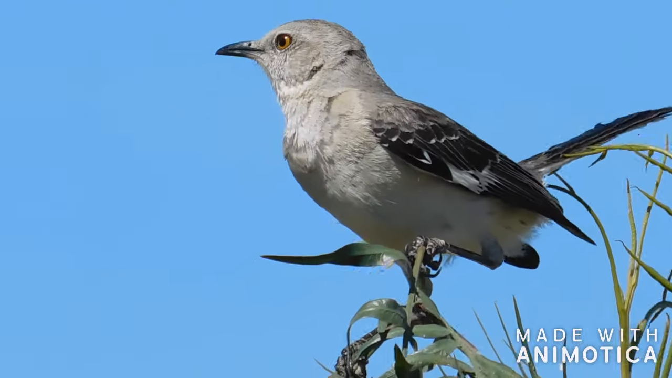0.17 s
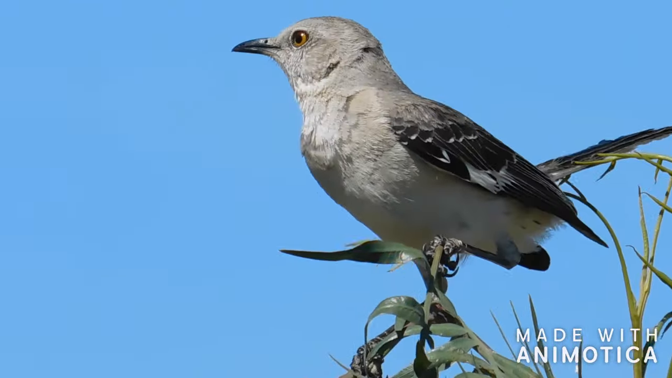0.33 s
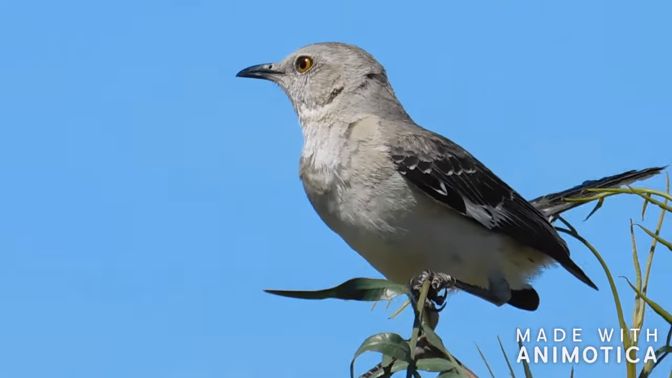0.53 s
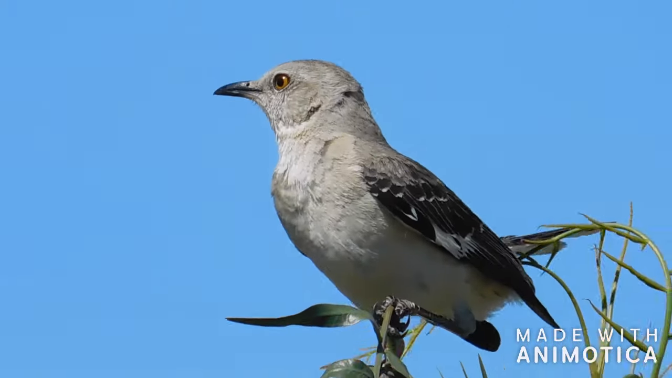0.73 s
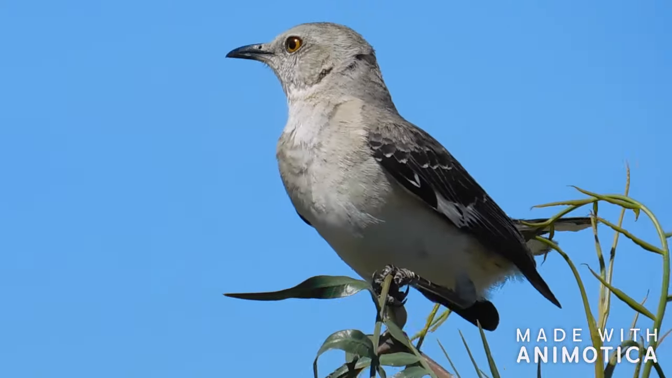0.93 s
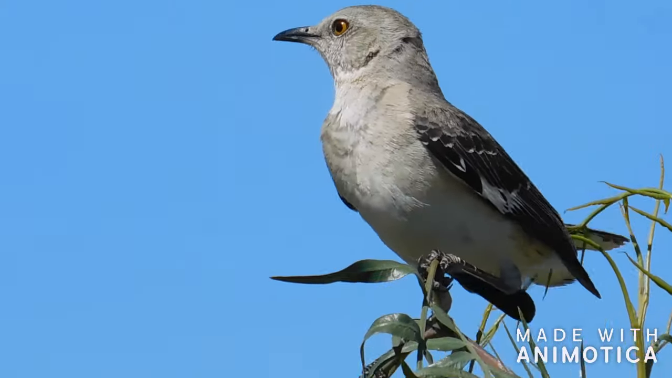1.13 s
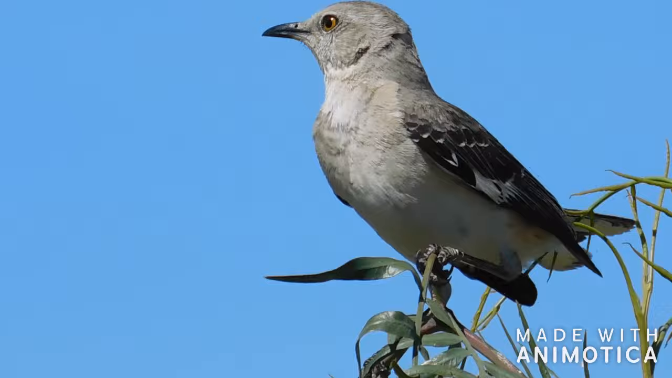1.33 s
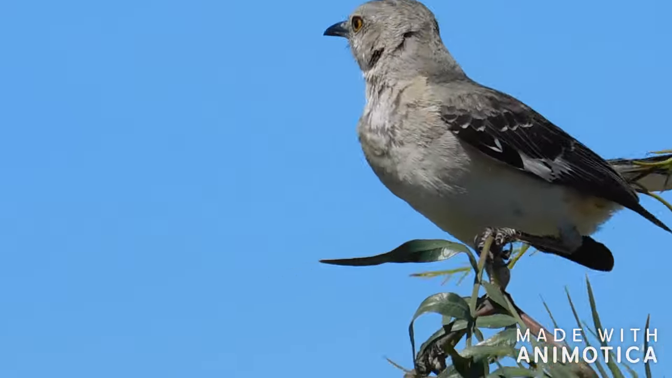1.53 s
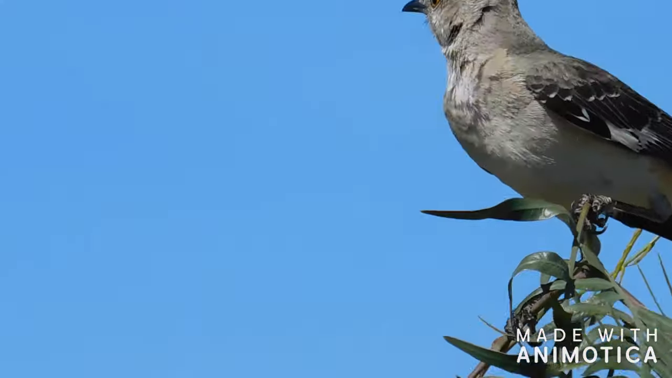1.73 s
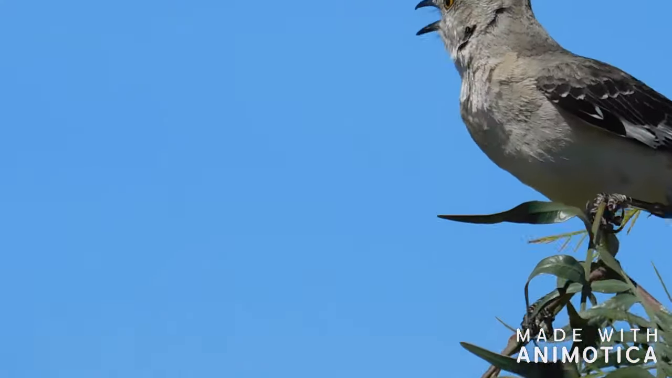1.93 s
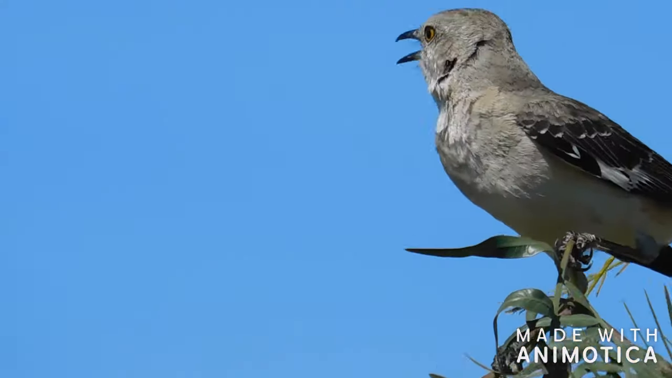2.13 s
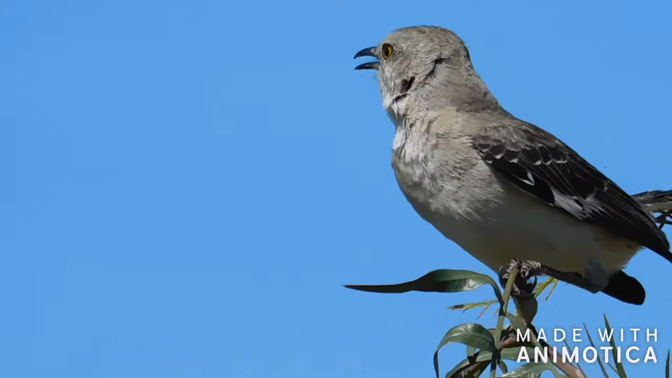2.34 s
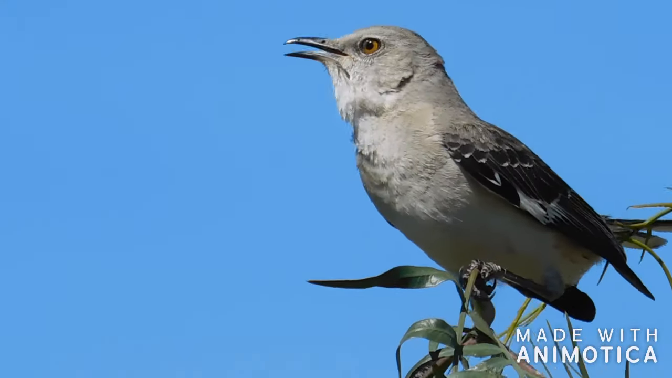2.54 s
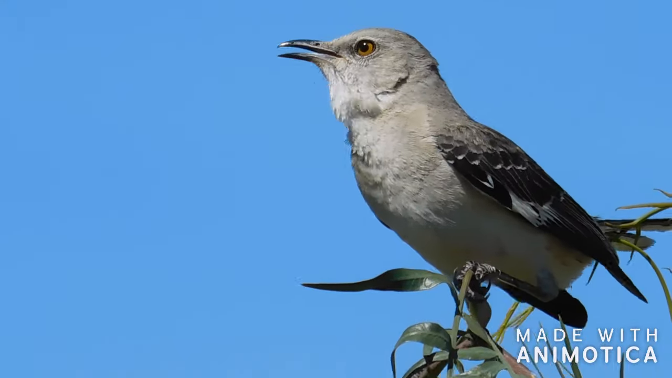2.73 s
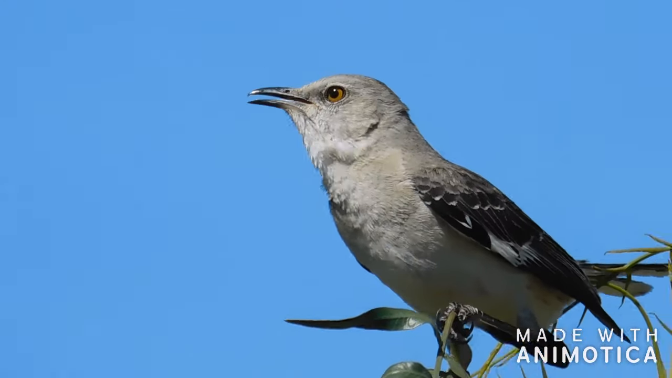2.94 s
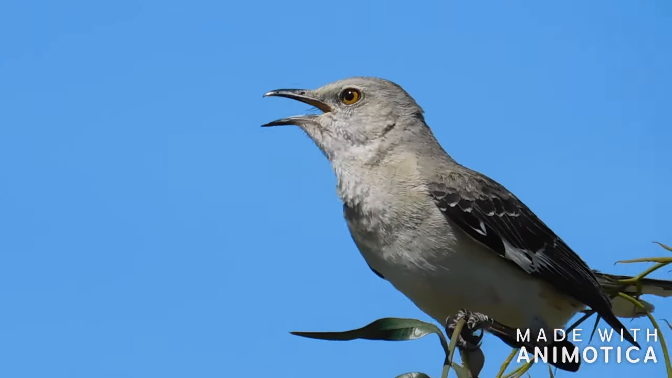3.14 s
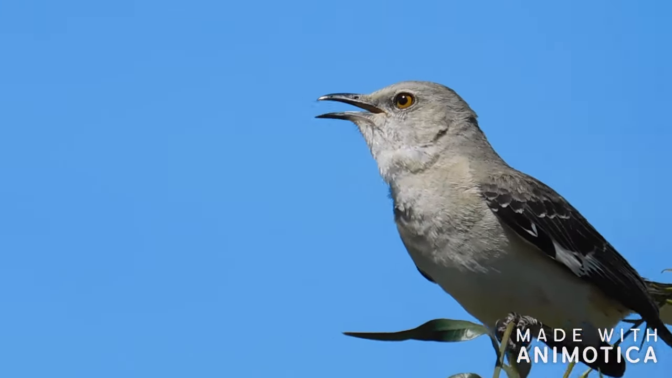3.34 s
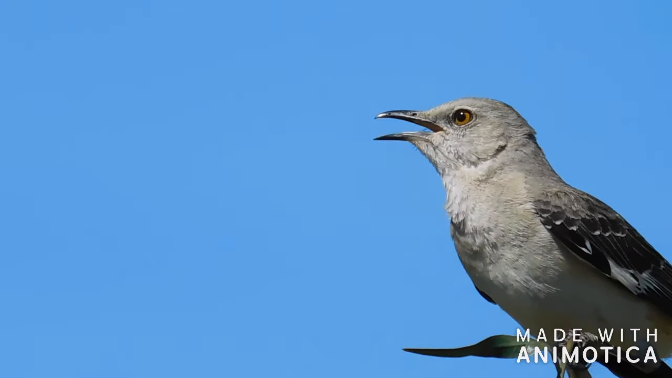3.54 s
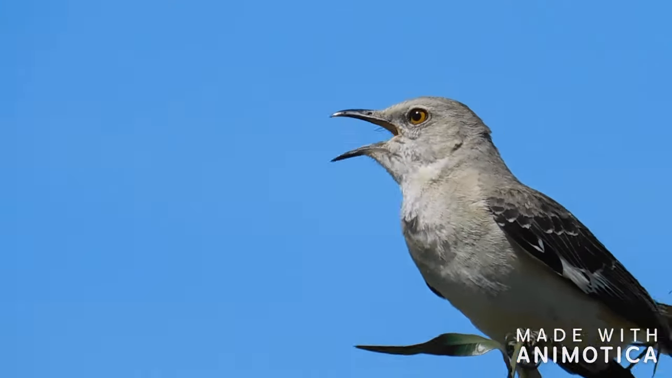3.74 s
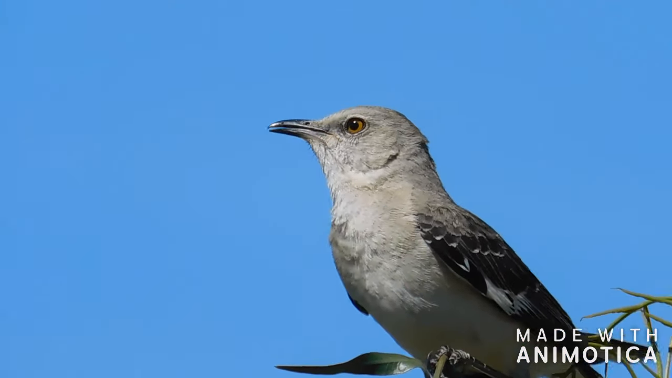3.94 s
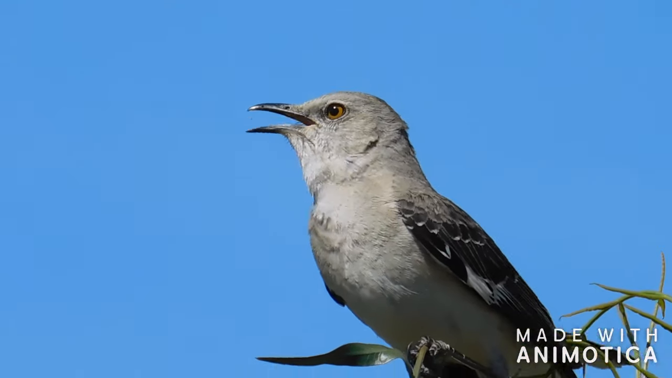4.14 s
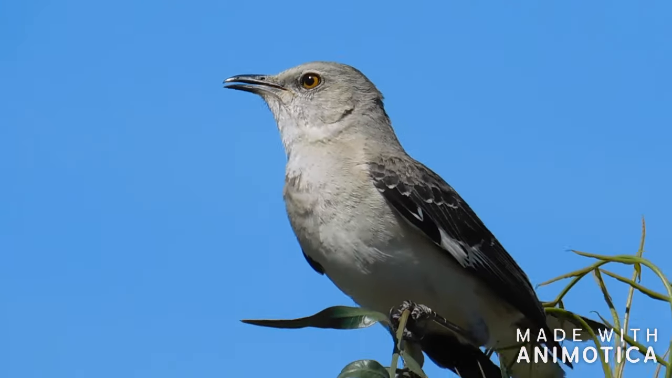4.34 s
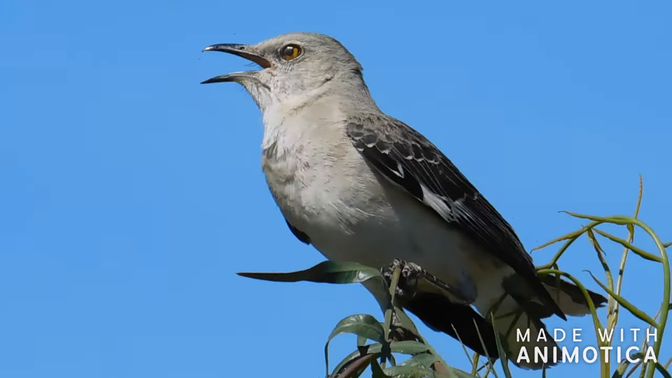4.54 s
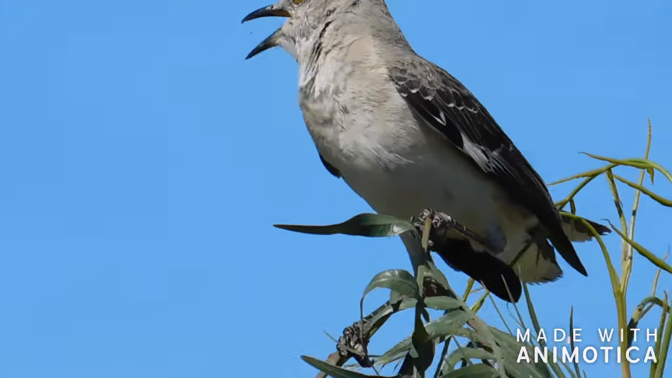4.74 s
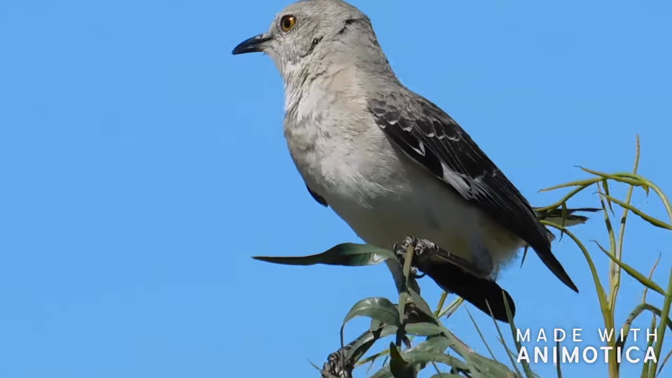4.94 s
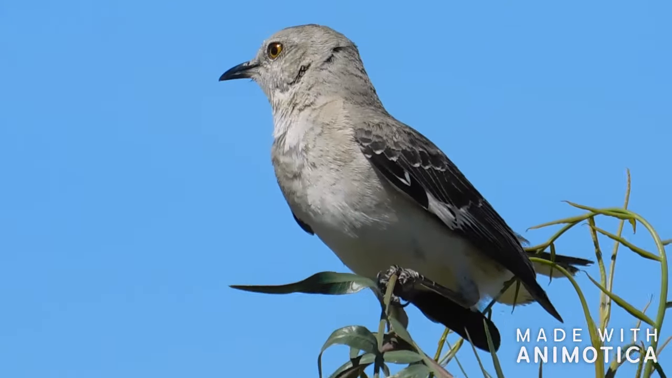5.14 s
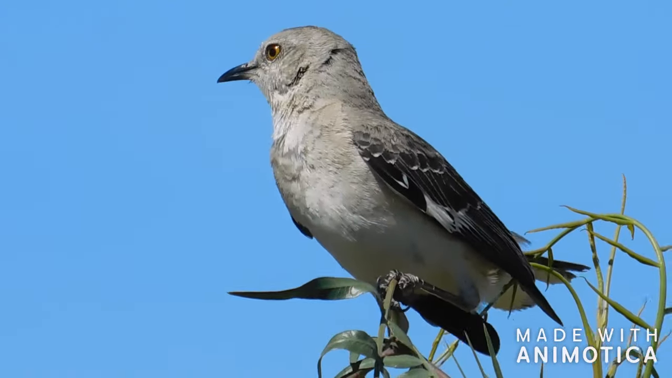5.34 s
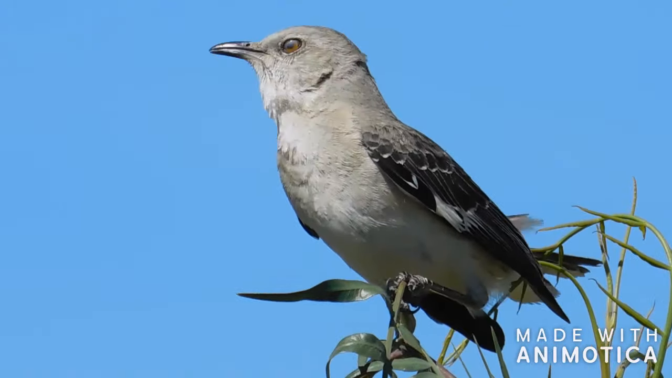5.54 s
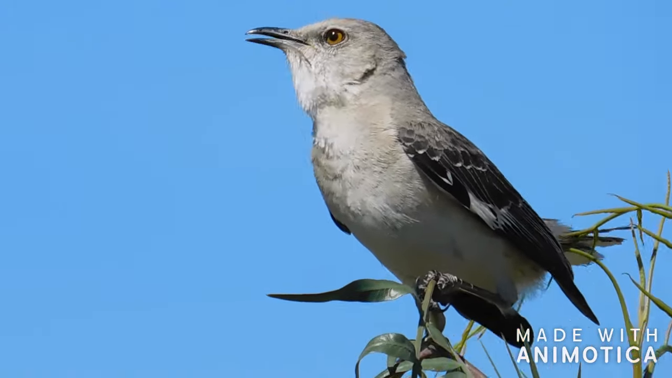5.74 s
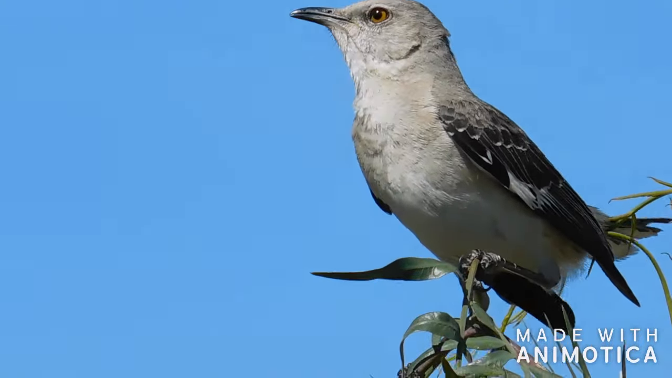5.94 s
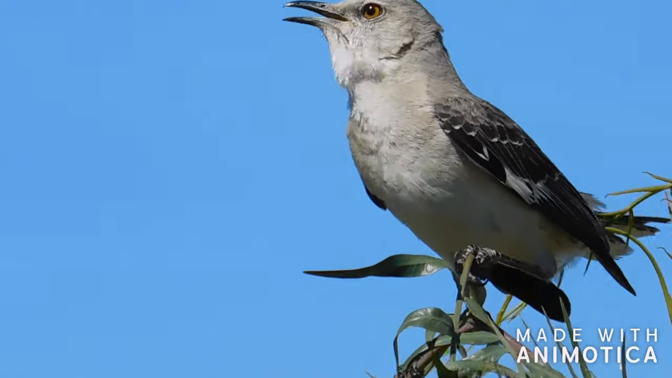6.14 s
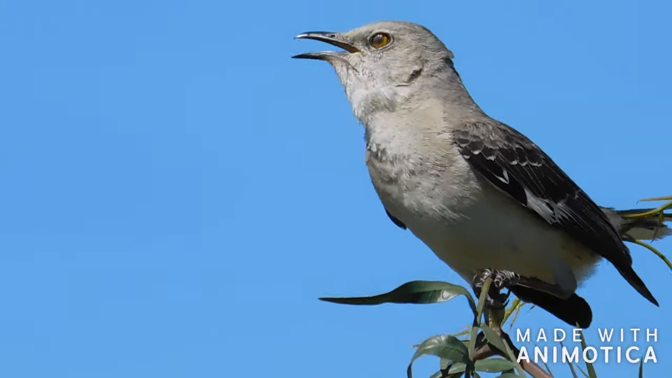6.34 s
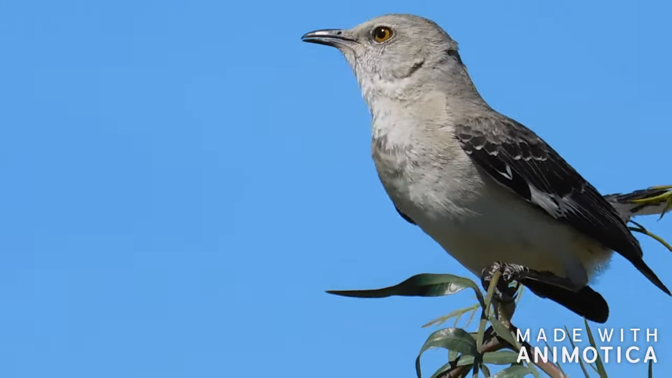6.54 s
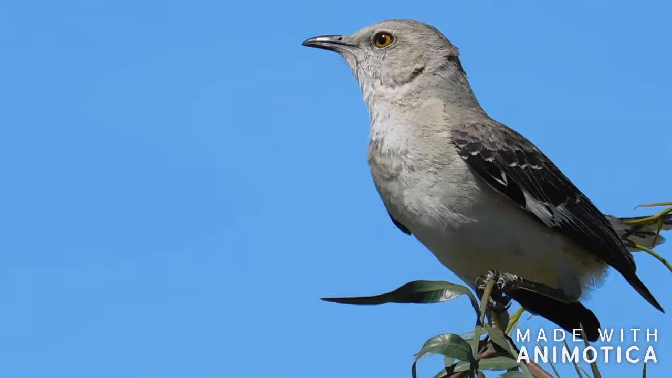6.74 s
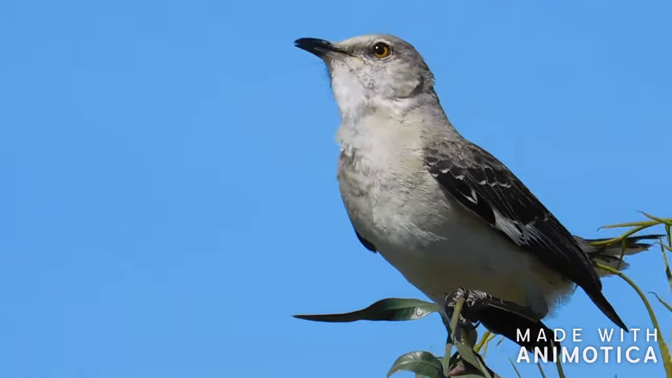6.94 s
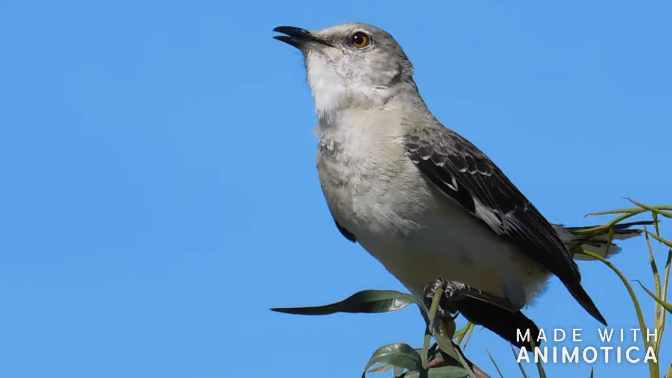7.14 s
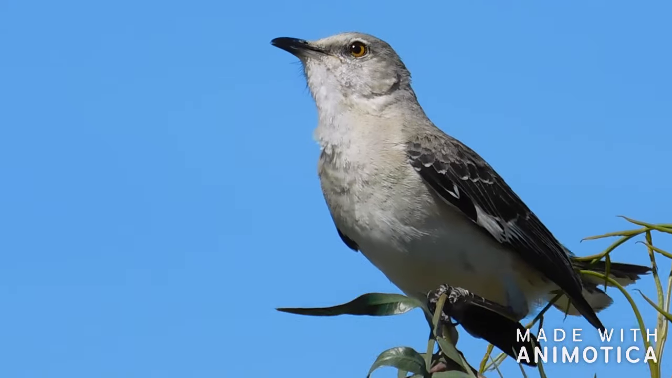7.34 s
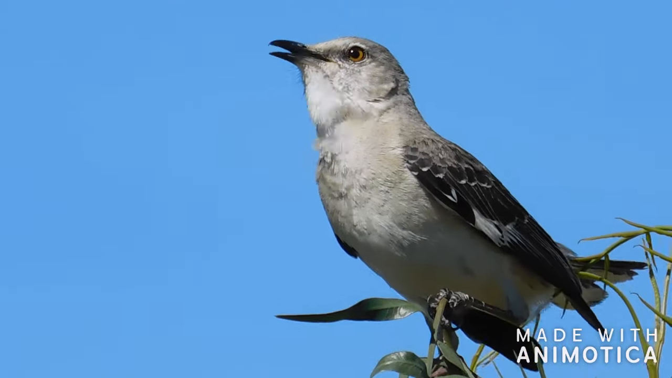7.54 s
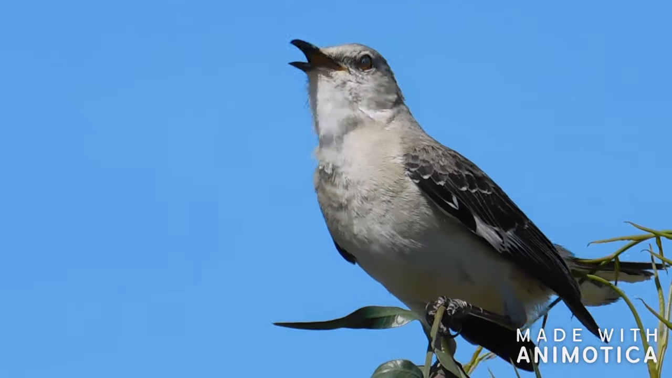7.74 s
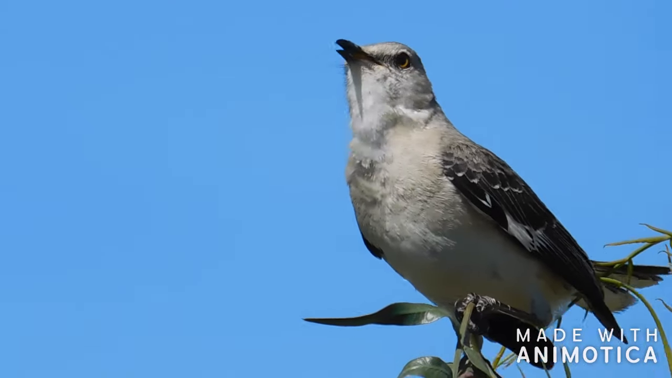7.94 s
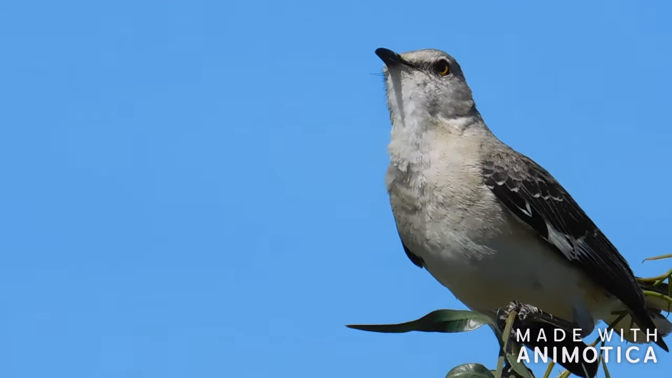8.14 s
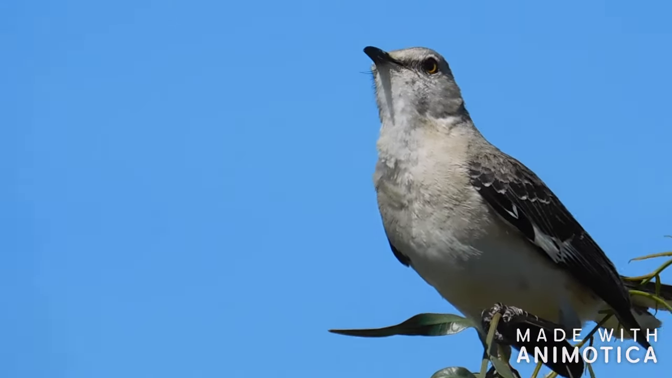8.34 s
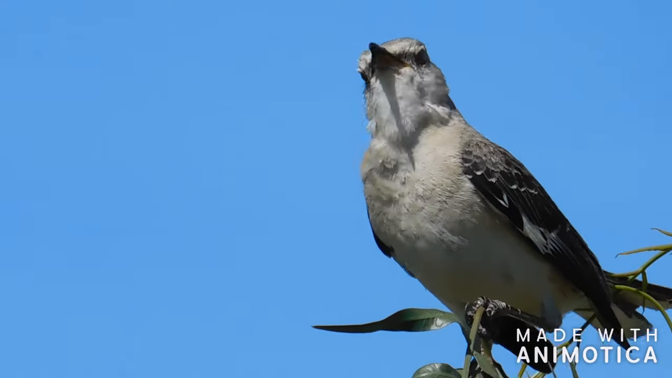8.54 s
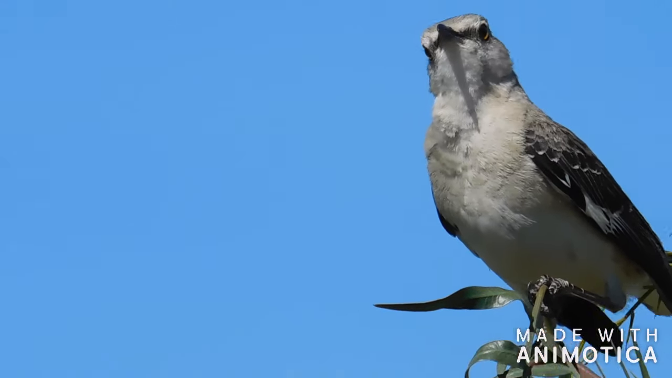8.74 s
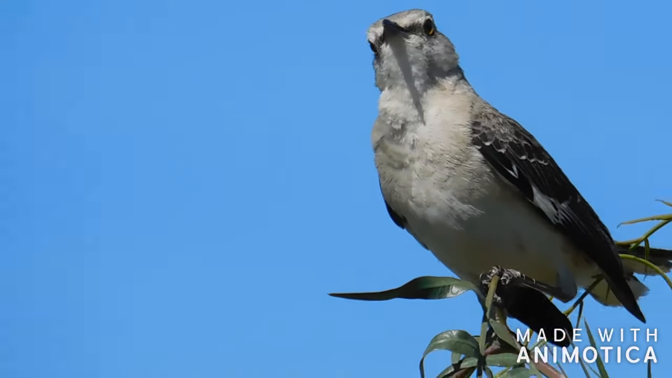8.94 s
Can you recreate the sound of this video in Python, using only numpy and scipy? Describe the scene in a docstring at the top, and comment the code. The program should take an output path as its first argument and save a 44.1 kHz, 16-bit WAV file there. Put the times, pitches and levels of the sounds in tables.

```python
"""Mockingbird in the open air

A mockingbird a few metres away repeats three phrases, then sings a few whistles once: gliding
near-sines with weak partials, and breath noise. Trees send back a thin echo of decaying noise. Around
it far traffic rumbles as shaped noise, an engine climbs through two gears as a rising tone, other birds
call faintly as curved sines, and low noise and soft knocks are wind on the two microphone ports."""
import sys
import numpy as np
from scipy import signal
from scipy.fft import rfft, irfft
from scipy.io import wavfile
from scipy.ndimage import uniform_filter1d

SR = 44100
rng = np.random.default_rng(int(sys.argv[2]) if len(sys.argv) > 2 else 0)


def linear_from_db(decibels):
    """Turn decibels (scalar or array-like) into linear amplitude factors; 0 gives 1."""
    return 10 ** (np.asarray(decibels, float) / 20)


def wav_out(sig):
    """Save sig, one row per channel (or a flat mono array), as 16-bit PCM at SR to the path in sys.argv[1]."""
    wavfile.write(sys.argv[1], SR, np.round(np.clip(np.atleast_2d(sig).T, -1, 1) * 32767).astype(np.int16))


N = 396018
T = np.arange(N) / SR

# wind and a slow engine over time: time_s, wind_rumble_db, firing_rate_hz, engine_partial_db
AIR_AND_ENGINE = [(0, -60, 22.5, -58.5), (1.2, -51, 15.1, -59.5), (1.903, -46, 16.9, -56),
                  (4.201, -55, 20.3, -62.5), (6.401, -69.5, 21.7, -57), (7.001, -73.5, 16, -75.5),
                  (7.6, -58.5, 32.6, -58), (8.98, -47, 22.8, -60.5)]
# beak opening, heard as a lift of the weak partials and the breath: time_s, lift_db
BEAK_OPENING = [(3.1, 1), (3.7, 6), (5.7, 3.5), (8.685, 4.5), (8.7, 10)]


def level(x, db):
    """Scale to an rms level."""
    return x * linear_from_db(db) / np.sqrt(np.mean(x ** 2))


def band(x, lo_hz, hi_hz):
    """Band-pass with gentle slopes."""
    return signal.sosfilt(signal.butter(2, [lo_hz, hi_hz], "band", fs=SR, output="sos"), x)


def walk(rate_hz):
    """Random wander: levels held for one period of the rate and slewed twice; spread somewhat under 1."""
    hold = int(SR / rate_hz)
    steps = np.repeat(rng.standard_normal(N // hold + 1), hold)
    return uniform_filter1d(uniform_filter1d(steps, hold), hold)[:N]


def town():
    """Far traffic and hiss in broad bands that drift a little; alike at both ports only in the bass."""
    # relative noise spectrum: frequency_hz, density_db (per Hz)
    town_spectrum = [(30, -10.5), (110, -10.5), (190, -22.5), (480, -21.5), (965, -18.5), (1700, -23),
                     (3290, -34), (5460, -45.5), (15700, -50.5)]
    hz, db = np.transpose(town_spectrum)
    bins_hz = np.fft.rfftfreq(N, 1 / SR)
    shape = linear_from_db(np.interp(np.log(bins_hz + 1), np.log(hz), db))
    alike = 0.93 / (1 + (bins_hz / 980.0) ** 2)
    mid, side = rfft(rng.standard_normal((2, N))) * shape * np.sqrt([1 + alike, 1 - alike])
    pair = np.array([mid + side, mid - side])
    octave = np.log2(bins_hz / 150 + 1).astype(int)
    out = 0
    for k in range(octave.max() + 1):
        out = out + irfft(pair * (octave == k), N) * linear_from_db(0.69 * walk(5.6))
    # a narrow wavering band of noise sits in the low treble
    whirr = band(rng.standard_normal((2, N)), 1754, 1804) * linear_from_db(2.4 * walk(11))
    return level(out, -53.5) + level(whirr, -65.0)


def engine():
    """A low tone that rises in each gear and fades at the change, over the low partials of a slow engine."""
    # an engine pulling in one gear: start_s, end_s, start_hz, end_hz, level_db
    gears = [(2.702, 4.253, 128, 150.3, -61.5), (4.788, 8.192, 121.6, 161.2, -60.5)]
    s, _, firing_hz, firing_db = np.transpose(AIR_AND_ENGINE)
    wavering_hz = np.interp(T, s, firing_hz) * (1 + 0.0075 * walk(4.5))
    turn = 2 * np.pi * np.cumsum(wavering_hz) / SR
    partials = sum(linear_from_db(2 * walk(1.7)) * np.sin(k * turn) for k in range(2, 6))
    out = linear_from_db(np.interp(T, s, firing_db)) * partials
    for start_s, end_s, start_hz, end_hz, db in gears:
        fade = np.clip(np.minimum((T - start_s) * 2, (end_s - T) * 10), 0, 1)
        hz = np.interp(T, [start_s, end_s], [start_hz, end_hz]) * (1 + 0.0042 * walk(6.5))
        out += fade * linear_from_db(db + walk(3.2)) * np.sin(2 * np.pi * np.cumsum(hz) / SR)
    return out


def wind():
    """A fluttering rumble, partly shared by the ports, and buffets: a burst of rumble with a soft knock."""
    # wind buffets, levels before the split between ports:
    # time_s, knock_db, right_share (0-1), burst_db
    buffets = [(1.448, -33.5, 0.25, -41), (1.493, -36, 0, -37.5), (1.851, -28.5, 0.04, -46),
               (2.115, -35, 0.07, -41), (2.181, -30, 0.1, -35), (2.373, -33.5, 0, -43),
               (2.55, -36.5, 0.02, -42.5), (4.935, -32.5, 0.76, -33.5), (8.632, -37.5, 1, -43.5)]
    s, db = np.transpose(AIR_AND_ENGINE)[:2]
    noise = rng.standard_normal((4, N))
    flutter = linear_from_db(1.8 * np.array([walk(24), walk(23.0)]))
    rumble = level(band(noise[:2] * flutter + noise[2], 21, 72.0), 0)
    eddies = level(band(noise[3] * linear_from_db(4.74 * walk(40)), 27, 86), 0)
    # the left port takes 3 dB more wind than the right
    out = rumble * linear_from_db(np.interp(T, s, db) + np.array([[1.5], [-1.5]]))
    for at, knock_db, right, burst_db in buffets:
        t = T - at
        knock = 1.85 * np.cos(2 * np.pi * 90 * t) / (1 + (t / 0.0017) ** 2)
        burst = eddies * np.exp(-(t / 0.046) ** 2)
        ports = 1.3 * np.array([1 - right, right])
        out += np.outer(ports, linear_from_db(knock_db) * knock + linear_from_db(burst_db) * burst)
    return out


def add(out, rows, partials_db, flutter_db=0., throb_hz=0.):
    """One note: a gliding near-sine with weak partials, which grow with pitch and drift, each by itself."""
    s, hz, db, *depth = np.transpose(rows)
    at = slice(int((s[0] - .002) * SR), int((s[-1] + .002) * SR))
    t = T[at]
    soft = lambda y: uniform_filter1d(y, size=50, mode="nearest")
    pitch = soft(np.interp(t, s, hz))
    # breath pressure swells in arcs rather than in straight dB lines
    pressure = soft(np.interp(t, s, linear_from_db(db) ** .6, left=0, right=0))
    gain = pressure.clip(0) ** (1 / .6)
    if depth:  # each throb is a short, uneven downward slur
        throb = 2 * np.pi * throb_hz * (t - s[0]) + 1.1 * walk(throb_hz / 2)[at]
        d = np.clip(np.interp(t, s, depth[0]), 0, 1)
        gain = gain * (1 - d * np.cos(throb))
        pitch = pitch * (1 + 0.07 * d * np.sin(throb))
    phase = 2 * np.pi * np.cumsum(pitch) / SR
    beak_db = np.interp(t, *np.transpose(BEAK_OPENING))
    for k, partial_db in enumerate(partials_db, 1):
        knots = np.linspace(t[0], t[-1], num=8)
        drift = np.interp(t, knots, rng.standard_normal(size=8)).clip(max=.5)
        audible = k * pitch < SR / 2
        if k == 2:  # from here up the partials swell less than the fundamental
            gain = gain ** .6 * linear_from_db(-12)
        lift_db = flutter_db * drift + 6.8 * np.log2(pitch / 2200) + beak_db
        weak = partial_db < -20  # strong partials hold steady
        out[at] += np.sqrt(2) * audible * gain * linear_from_db(partial_db + weak * lift_db) * np.sin(k * phase)


def far_birds():
    """Faint curved whistles, loudest in the middle, peeps and scattered chatter; they shimmer on their long way."""
    # far calls: start_s, length_s, start_hz, middle_hz, end_hz, level_db (mid-note, before shimmer)
    calls = [(0.222, .06, 2650, 2550, 2300, -63), (0.495, .1, 2600, 2350, 2080, -64),
             (0.702, .135, 4600, 4380, 4330, -81), (0.752, .12, 900, 980, 1060, -59),
             (0.768, .05, 2700, 2540, 2300, -62), (0.92, .045, 2150, 2200, 2050, -63),
             (0.99, .03, 2000, 2100, 2250, -64), (1.096, .035, 2850, 3080, 3150, -65),
             (4.58, .035, 2450, 2450, 2200, -64), (5.125, .055, 3620, 2950, 2620, -64),
             (5.28, .03, 2150, 2420, 2200, -60), (6.125, .06, 2500, 2850, 1900, -62),
             (6.196, .022, 2020, 2060, 2150, -61), (8.49, .055, 4200, 4600, 3900, -76),
             (8.91, .055, 2550, 2750, 2850, -64)]
    # a far run of arched peeps: start_s
    peep_starts = [5.408, 5.453, 5.486, 5.515]
    # pitch range of the chatter: low_hz, high_hz
    chatter_range = (2000, 3200)
    peep_s = .024
    out, place = np.zeros(N), np.linspace(-1, 1, num=9)
    peeps = [(s, peep_s, 2950, 3400, 2950, -63) for s in peep_starts]
    chatter = []
    for when, a, b in rng.random(size=(70, 3)):
        glide_hz = np.interp([a, a, (a + b) / 2], [0, 1], chatter_range)
        chatter.append((.1 + 8.7 * when, peep_s, *glide_hz, -72))
    for s, length_s, start_hz, mid_hz, end_hz, db in calls + peeps + chatter:
        slope, bow = (end_hz - start_hz) / 2, (start_hz + end_hz) / 2 - mid_hz
        hz = mid_hz + slope * place + bow * place ** 2
        rows = np.transpose([s + (place + 1) / 2 * length_s, hz, db - 6 * place ** 2])
        add(out, rows, [0])
    return out * linear_from_db(4 * walk(150))


def trees(x, db, t60_s):
    """A thin wash off foliage and ground with a few distinct echoes, different at each port, without the top."""
    # single trees and walls that stand out of the echo: delay_s, lift_db
    reflectors = [(0.044, 8), (0.092, 6), (0.275, 24)]
    t = T[:SR]
    lift_db = sum(up_db * np.exp(-((t - s) / 0.0057) ** 2) for s, up_db in reflectors)
    decay = linear_from_db(lift_db - 60 * t / t60_s)
    echo = rng.standard_normal((2, SR)) * decay * np.clip(t / 0.007, 0, 1)
    echo = band(echo / np.sqrt(np.sum(echo ** 2) / 2), 500, 3700)
    return linear_from_db(db) * signal.fftconvolve(x[None], echo, axes=1)[:, :N]


def sung(gesture, s, lead_s, tail_s, low_hz, high_hz, db, swell_db=0., whip_hz=0.):
    """A gesture stretched to one syllable's time, range and level; a whip bends its end upward."""
    place, share, below_db = np.transpose(gesture)
    at = s + place * np.where(place < 0, lead_s, tail_s)
    hz = low_hz + share * (high_hz - low_hz) + whip_hz * np.abs(place) ** 4.5
    return np.transpose([at, hz, db + below_db + swell_db * (place - .5)])


def fall(s, length_s, top_hz, rest_hz, last_hz, db, fade_db):
    """Pitch relaxes from the top to rest and drifts on; quick attack, accent, even fade, quick release."""
    place = np.linspace(0, 1, num=80)
    t = place * length_s
    settle = np.exp(-(t / 0.0093) ** 1.275)
    hz = rest_hz + (top_hz - rest_hz) * settle + (last_hz - rest_hz) * place ** 2
    edges = np.exp(-(t / 0.0044) ** 2) + np.exp((t - length_s) / 0.0037)
    accent = np.exp(-((t - 0.023) / 0.019) ** 2)  # swells just as the pitch lands
    return np.transpose([s + t, hz, db + fade_db * place - 26 * edges + 2.5 * accent])


def song():
    """The plain whistled notes as rows of time, pitch and level."""
    # Gestures: place, pitch_share (of the way from low to high), level_db (relative to the syllable).
    # Place -1..0 spans the lead and 0..1 the tail.
    chip, chuck = [(-1, 0.91, -18.5), (-0.44, 0.32, -1.5), (-.25, .02, -7.5), (0.095, 1, -8),
                   (.15, 0.66, -1), (0.41, 0.29, -0.5), (0.98, -0.058, -19.5)], [(-0.95, 1.39, -26.5), (-.62, 0.51, -6.5), (-.33, .2, -0.3),
                                 (-0.088, 1, -3), (0.049, .75, -3.5), (0.28, .45, -1), (.75, 0.009, -11.5),
                                 (0.92, 0.071, -19.5)]
    rise, climb = [(0, 0.27, -34.5), (.2, 0.031, -15), (.6, .25, -2), (.85, 0.52, 0), (.93, .85, -17.5),
                   (1, 0.39, -27)], [(0, 0.035, -28.5), (.14, 0.28, -10.5), (.27, .6, -5.5), (.42, 0.75, 1),
                                 (.6, .87, -3.5), (.75, .94, 1.5), (.94, 0.94, -12), (1, 0.98, -17)]
    # two-part syllables: turn_s, lead_s, tail_s, low_hz, high_hz, level_db
    chips, chucks = [(2.04, 0.012, 0.034, 2004, 2704, -36.5), (2.26, 0.018, 0.025, 2023, 2800, -30),
                     (2.485, 0.017, 0.031, 2010, 2735, -31.5), (2.71, 0.016, .032, 2020, 2780, -29),
                     (2.945, 0.019, 0.022, 2003, 2720, -27)], [(5.683, 0.025, .029, 2150, 2930, -29),
                                    (6.339, 0.024, .034, 2050, 2830, -25.5),
                                    (7.033, 0.026, .03, 2010, 2842, -26)]
    # one-part syllables: start_s, length_s, low_hz, high_hz, level_db, swell_db (start to end);
    # climbs add whip_hz, an upward bend at the end
    rises, climbs = [(2.094, 0.041, 2690, 3555, -29, 2), (2.305, 0.055, 2756, 3560, -25, -4),
                     (2.533, 0.052, 2697, 3474, -24.5, -0.5), (2.758, 0.057, 2653, 3616, -23.5, -2.5),
                     (3.01, 0.043, 2564, 3780, -24.5, 2.5)], [(3.407, 0.062, 1943, 3536, -30, -4.5, 992),
                                    (3.857, 0.072, 2015, 3694, -31, 8.5, 772),
                                    (4.317, 0.066, 1784, 3790, -26.5, -3, 908),
                                    (4.851, 0.068, 2063, 3450, -33.5, -5.5, 2040)]
    # after a break the voice drops from the top and settles:
    # start_s, length_s, top_hz, resting_hz, last_hz, level_db, fade_db
    falls = [(2.141, 0.04, 3920, 2873, 2745, -27.5, -7), (2.359, 0.042, 3970, 2836, 2704, -26, -8.5),
             (2.583, 0.053, 3834, 2775, 2514, -22.5, -16.5), (2.815, 0.064, 3996, 2750, 2870, -23.5, -15),
             (3.054, 0.054, 4030, 2874, 2555, -23.5, -10.5), (3.469, 0.065, 4490, 2846, 2765, -24, -7.5),
             (3.925, 0.068, 4490, 3010, 2983, -25, -5), (4.382, 0.073, 4710, 2760, 2990, -21.5, -17),
             (4.921, 0.078, 4750, 2847, 2754, -28, -5)]
    # notes sung only once: time_s, pitch_hz, level_db
    high_chuck, hold, pip, warble = [(7.739, 3085, -40), (7.745, 2730, -34), (7.749, 2517, -25.5),
                                     (7.757, 3060, -32), (7.769, 2270, -26), (7.776, 2030, -34.5),
                                     (7.795, 1966, -50)], [(7.922, 2300, -50), (7.946, 2510, -31.5),
                                                         (7.956, 2366, -30), (8.008, 2248, -22.3),
                                                         (8.04, 2250, -24), (8.068, 2274, -27.5),
                                                         (8.074, 2460, -49.5)], [(8.572, 2000, -54),
                                                                       (8.579, 2217, -28.5),
                                                                       (8.587, 2180, -26.5),
                                                                       (8.594, 1780, -45),
                                                                       (8.597, 1830, -43)], [(8.657, 2210, -39.5),
                                                                                    (8.684, 2455, -23.5),
                                                                                    (8.693, 2030, -34.5),
                                                                                    (8.7, 2904, -25),
                                                                                    (8.706, 3282, -29.5),
                                                                                    (8.718, 2953, -18.5),
                                                                                    (8.724, 2045, -35),
                                                                                    (8.73, 2470, -65)]
    two = [sung(g, *row) for g, rows in [(chip, chips), (chuck, chucks)] for row in rows]
    one = [sung(g, s, 0, *row) for g, rows in [(rise, rises), (climb, climbs)] for s, *row in rows]
    return two + one + [fall(*row) for row in falls] + [high_chuck, hold, pip, warble]


def mockingbird():
    """Whistles, chirps and trills with a slight shimmer of level, and breath rasping through the beak."""
    # gestures: place (0-1), pitch_share (of the way from low to high), level_db (relative)
    slur, chirp = [(0, .3, -19), (.13, 0.95, -11), (.3, 0.93, -1), (.5, 0.49, -1.5), (.85, .06, -6.5),
                   (1, 0.029, -17)], [(0, 0.04, -25), (.2, 0.52, -6), (.45, 0.8, 0), (.55, 0.98, 4),
                                 (.8, 0.41, -2.5), (1, 0.053, -13)]
    # syllables: start_s, length_s, low_hz, high_hz, level_db, swell_db (start to end)
    slur_rows, chirp_rows = [(3.33, 0.079, 1866, 2550, -27.5, -6.5), (3.763, 0.095, 1860, 2450, -31, -1.5),
                             (4.226, 0.084, 1924, 2690, -29.5, 6), (4.753, 0.087, 1866, 2393, -28.5, -2.5)], [(3.288, 0.027, 1187, 1737, -35, -6),
                                            (3.719, 0.027, 1190, 1740, -37, -1),
                                            (4.185, 0.025, 1253, 1980, -35, 3),
                                            (4.707, 0.028, 1300, 1854, -34, 6)]
    # arched whistles, one list each: time_s, pitch_hz, level_db
    arches = [
        [(5.77, 2360, -49), (5.787, 2875, -27), (5.801, 3106, -25), (5.829, 3225, -34.5), (5.845, 3128, -25),
         (5.869, 2684, -30), (5.901, 2553, -46), (5.961, 2645, -47), (5.978, 2500, -53)],
        [(6.425, 2520, -50), (6.433, 2380, -40), (6.445, 2740, -34.5), (6.463, 2923, -24), (6.483, 3204, -32.5),
         (6.507, 3086, -25.5), (6.525, 2770, -27.5), (6.549, 2637, -38.5), (6.605, 2610, -53.5),
         (6.612, 2350, -48)],
        [(7.172, 2026, -44), (7.18, 2215, -35), (7.198, 2817, -28.5), (7.214, 3080, -26.5),
         (7.222, 3225, -33.5), (7.246, 3050, -25.5), (7.268, 2715, -29.5), (7.3, 2663, -43),
         (7.356, 2517, -43.5), (7.37, 2305, -53)],
    ]
    # throbbing notes from the other side of the syrinx: time_s, pitch_hz, level_db, throb_depth (0-1)
    trills = [
        [(7.857, 2116, -52, 0.51), (7.878, 2335, -43, 0.85), (7.888, 2250, -37, 0.2), (7.899, 2230, -37, 0.5)],
        [(7.903, 2980, -36, 0.6), (7.908, 2840, -31.5, 0.6), (7.953, 2992, -31, 0.6), (7.964, 2770, -48, 0.2)],
        [(7.882, 3530, -56, 1), (7.893, 3040, -45, 0.9), (7.899, 2900, -54, 0.4)],
    ]
    # one throb rate for each trill: rate_hz
    throb_rates = [205, 169, 134]
    # partials from the first up: level_db (relative); slurs are reedier, arches nearly pure
    whistle_db, chirp_db = [0.5, -45.5, -48, -48.5, -53.5, -50], [-11, -1.5, -31, -40, -46, -48]
    slur_db, arch_db = [0.5, -33.5, -42, -49.5, -49], [0.5, -50, -51.5, -54.5, -49]
    out = np.zeros(N)
    slurs = [sung(slur, s, 0, *row) for s, *row in slur_rows]
    for notes, partials_db in [(song(), whistle_db), (slurs, slur_db), (arches, arch_db)]:
        for rows in notes:
            add(out, rows, partials_db, flutter_db=5.0)
    other_side = np.zeros(N)
    for rows, throb_hz in zip(trills, throb_rates):
        add(other_side, rows, arch_db, flutter_db=11.0, throb_hz=throb_hz)
    # where both sides sound together they couple into a faint sum tone
    sum_tone = linear_from_db(-1.5) * band(out * other_side, 4800, 6200)
    out = out + other_side + sum_tone
    for s, *row in chirp_rows:  # loudest on their second partial
        add(out, sung(chirp, s, 0, *row), chirp_db, flutter_db=5.0)
    effort = uniform_filter1d(np.abs(out), size=200).clip(0) ** .7
    breath = band(rng.standard_normal(N), 4400, 19000)
    beak_db = np.interp(T, *np.transpose(BEAK_OPENING))
    rasp = effort * breath * linear_from_db(-53 + 4.0 * walk(40) + beak_db)
    return out * linear_from_db(0.47 * walk(440)) + rasp


def at_ports(bird):
    """The direct voice reaches the left port later; the housing shades the ports and trims the treble lag."""
    # uneven shading by the housing: frequency_hz, left_minus_right_db
    balance = [(1900, 3), (2650, -3.5), (4500, 2.5), (6000, -1.5), (12000, -4)]
    cycles = np.fft.rfftfreq(N)  # per sample
    lag = 1.5 / (1 + (cycles * SR / 8000) ** 2)  # samples, halved at 8 kHz
    half_db = np.interp(cycles * SR, *np.transpose(balance)) / 2
    left = linear_from_db(half_db) * np.exp(-2j * np.pi * lag * cycles)
    return irfft(rfft(bird) * np.array([left, linear_from_db(-half_db)]), N)


def scene():
    """The singer slightly to the right, with its echo, the far birds, town, engine and wind around it."""
    bird, far = mockingbird(), far_birds()
    distant = far + trees(far, db=-2, t60_s=0.3)
    near = at_ports(bird) + trees(bird, db=-16, t60_s=0.41)
    return near + distant + town() + engine() + wind()


def band_limit(x):
    """A steep low-pass at the top of the band."""
    return signal.sosfilt(signal.butter(12, 15890, fs=SR, output="sos"), x)


def record(dry):
    """A steep low-pass cuts the top of the mix at 15.8 kHz."""
    cut = signal.sosfilt(signal.ellip(8, .2, 70, 15800, fs=SR, output="sos"), dry)
    return band_limit(cut)


dry = scene()
out = record(dry)
wav_out(out)
```